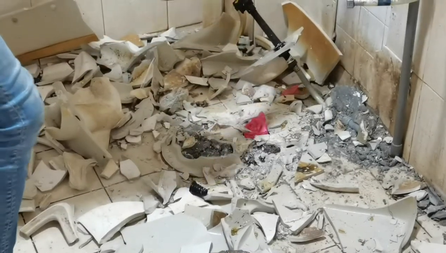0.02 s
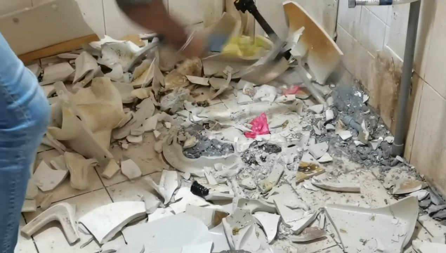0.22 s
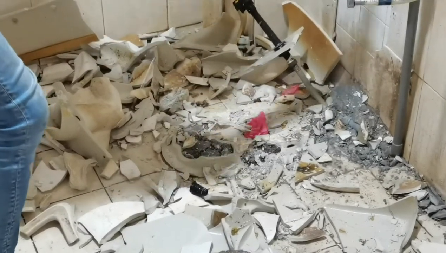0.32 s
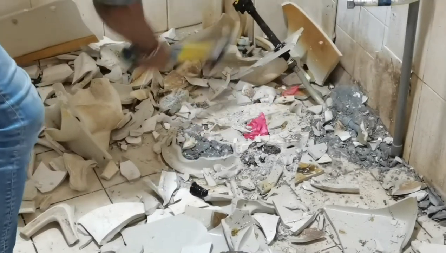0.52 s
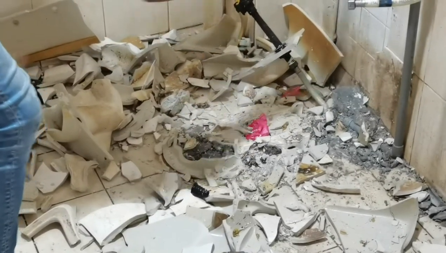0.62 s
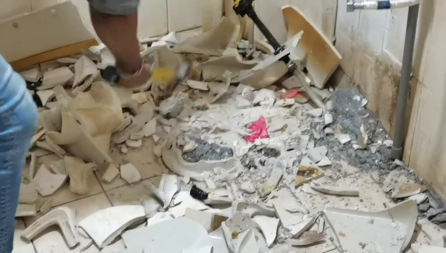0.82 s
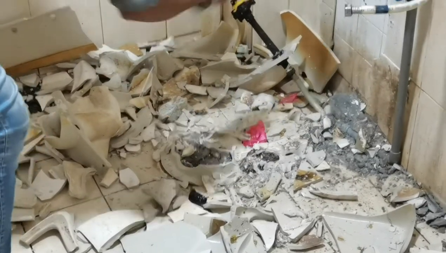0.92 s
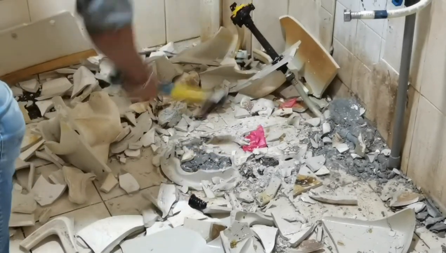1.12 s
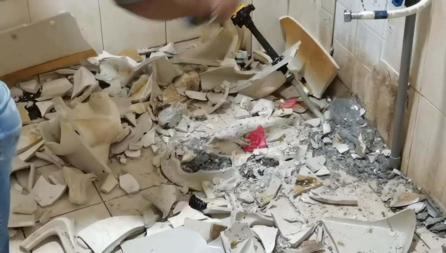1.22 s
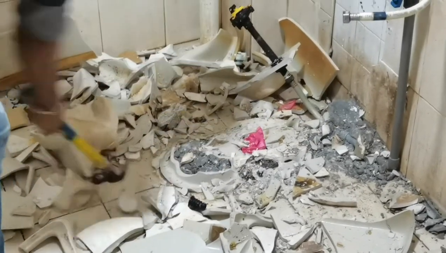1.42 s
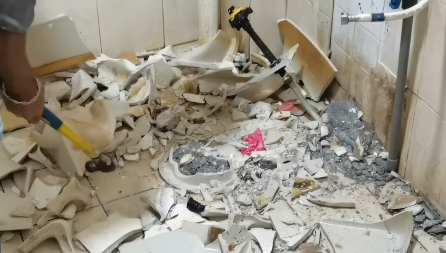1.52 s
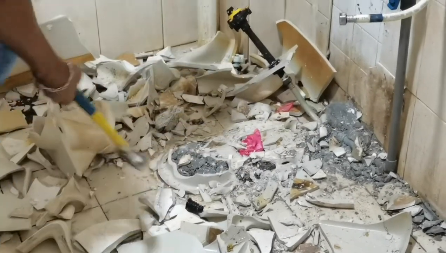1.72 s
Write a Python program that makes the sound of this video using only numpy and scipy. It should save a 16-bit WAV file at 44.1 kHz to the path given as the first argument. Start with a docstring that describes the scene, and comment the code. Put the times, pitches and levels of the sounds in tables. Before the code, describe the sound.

Rapid hammer blows crack thick ceramic apart, broken pieces clinking and skittering in a small tiled room

```python
"""Sharp smashing blows, about three a second: a hammer breaks pieces of a ceramic bowl on a small tiled
bathroom floor. Each blow is a burst of tiny cracks, a short ring of the steel head and a damped floor thud.
Pieces split, grit skitters and chips clink: filtered bursts of cracks and fading sine tones.
Fading noise gives the echoes of the hard walls, over a faint rumble and hum made of filtered noise.
The left microphone hears far more treble than the right."""
import sys
import numpy as np
from scipy import signal
from scipy.fft import rfft, irfft
from scipy.io import wavfile
from scipy.ndimage import uniform_filter1d

SR = 44100
rng = np.random.default_rng(int(sys.argv[2]) if len(sys.argv) > 2 else 0)


def int16_out(signal):
    """Quantize to a 16-bit WAV file."""
    q = np.round(np.clip(np.atleast_2d(signal).T, -1, 1) * 32767)
    wavfile.write(sys.argv[1], SR, q.astype(np.int16))


N = 79380  # samples in the scene

LENGTH = 32768  # samples in each single sound or room response
AGE = np.arange(LENGTH) / SR  # seconds since a sound began
HZ = np.maximum(np.arange(LENGTH // 2 + 1) * SR / LENGTH, 1)  # frequencies of its spectrum
CRACKS_PER_S = 5500  # average rate before the burst is faded
CLINK_T60_S = 0.041  # time for a clink to fall by 60 dB
SHARD_ROOM_DB, SHARD_DIRECT_DB = -1, 2.5  # echoes and direct sound of grit and clinks


def undb(db):
    """Turn decibels into an amplitude factor."""
    return 10 ** (np.asarray(db) / 20)


def unit(x):
    """Scale to an energy of one."""
    return x / np.sqrt(np.sum(x ** 2, axis=-1, keepdims=True))


def curve(points, hz):
    """Join (Hz, value) points by straight lines on a log-frequency axis."""
    f, v = np.array(points, float).T
    return np.interp(np.log(np.maximum(hz, 1)), np.log(f), v)


def colour(x, gain):
    """Filter with the given gain at every frequency, responding only after the input arrives."""
    # Folding the cepstrum (spectrum of the log gain) onto positive times makes the filter causal.
    cepstrum = irfft(np.log(gain + 1e-5))
    cepstrum[1:LENGTH // 2] *= 2
    cepstrum[LENGTH // 2 + 1:] = 0
    return irfft(rfft(x) * np.exp(rfft(cepstrum)))


def neutral(gain):
    """Scale a filter so that it keeps the power of white noise."""
    return gain / np.sqrt(np.mean(gain ** 2))


def hump(hz, octaves):
    """A resonance, bell-shaped in octaves."""
    distance = np.log2(HZ / hz) / octaves
    return neutral(np.exp(-distance ** 2 / 2) + 1e-3)


def ring(modes):
    """Struck modes: sine tones that each fade at their own rate (Hz, dB of energy, t60 in s)."""
    total = 0
    for hz, db, t60 in modes:
        fade = np.exp(-np.log(1000) * AGE / t60)
        total = total + undb(db) * unit(np.sin(2 * np.pi * hz * AGE) * fade)
    return total


def crackle(length_s, per_s=CRACKS_PER_S, spread_db=4):
    """A burst of tiny cracks of uneven size that dies away, about equally strong at all pitches."""
    rise_s, even_hz = 0.0022, 260  # build-up time; width over which the spectrum is evened out
    happens = rng.random(LENGTH) < per_s / SR
    sizes = rng.choice([-1, 1], LENGTH) * undb(spread_db * rng.standard_normal(LENGTH))
    envelope = (1 - np.exp(-AGE / rise_s)) ** 2 * np.exp(-AGE / length_s)
    burst = happens * sizes * envelope
    power = uniform_filter1d(np.abs(rfft(unit(burst))) ** 2, size=int(even_hz * LENGTH / SR))
    return unit(colour(burst, 1 / np.sqrt(power)))


def thump(hz, length_s):
    """A heavily damped swing of the floor."""
    return unit(np.sin(2 * np.pi * hz * AGE) * AGE * np.exp(-2 * AGE / length_s))


def room():
    """Echoes from one spot on the floor to both microphones: dense fading noise and standing waves."""
    # how long the echoes last in each part of the spectrum (f/Hz, t60/s)
    decay_times = [(100, 0.37), (300, 0.35), (800, 0.42), (2000, 0.36), (5000, 0.26), (9000, 0.3),
                   (15000, 0.18)]
    # standing waves between the walls (f/Hz, level/dB, t60/s)
    standing_waves = [(256.8, -29, 0.45), (1385, -29, 0.32)]
    build_s = 0.0016
    noise = rfft(rng.standard_normal((2, LENGTH)))
    log_centres = np.log([hz for hz, _ in decay_times])
    tail = 0
    for share, (_, t60) in zip(np.eye(len(decay_times)), decay_times):
        band = np.interp(np.log(HZ), log_centres, share)  # overlapping bands that add up to one
        tail = tail + irfft(noise * band) * np.exp(-np.log(1000) * AGE / t60)
    return unit(tail * (1 - np.exp(-AGE / build_s))) + ring(standing_waves)


def near():
    """The direct sound and its first echoes off the floor and the nearby rubble, at both microphones."""
    early_db, early_s = 0.5, 0.0032  # level relative to the direct sound; fading time
    right_lag_s = 0.00025
    path = np.array([undb(early_db) * crackle(early_s) for _ in range(2)])
    path[0, 0] += 1
    path[1, int(right_lag_s * SR)] += 1
    return unit(path)


def add(out, start_s, sound, echoes, direct_db):
    """Mix in a sound, direct and with its echoes; a negative start leaves only its later part."""
    path = echoes + undb(direct_db) * near()
    i = int(start_s * SR)
    heard = signal.fftconvolve(sound[None], path, axes=1)[:, max(-i, 0):N - i]
    first = max(i, 0)
    out[:, first:first + heard.shape[1]] += heard


def background():
    """Faint rumble of the building, and a hum: narrow noise that wavers and grows a little."""
    # spectrum of rumble and air, scaled as a whole below (f/Hz, relative level/dB per Hz)
    air_spectrum = [(25, -22), (70, -6.5), (100, -6), (140, -1.5), (300, -18), (1000, -22), (3000, -35.5),
                    (15000, -45.5)]
    air_db, hum_db, hum_hz, hum_width_hz = -61.5, -61, 96.3, 7
    swell_db = 6  # rise of the hum from start to end
    hz = np.arange(N // 2 + 1) * SR / N
    air = irfft(rfft(rng.standard_normal((2, N))) * undb(curve(air_spectrum, hz)), N)
    resonance = 1 / (1 + ((hz - hum_hz) / hum_width_hz) ** 2)
    hum = irfft(rfft(rng.standard_normal((2, N))) * resonance, N)
    swell = undb(swell_db * (np.arange(N) / N - .5))
    return np.sqrt(N) * (undb(air_db) * unit(air) + undb(hum_db) * unit(hum) * swell)


def bumps(out, echoes):
    """Heavy pieces bump dully on the floor, which swings briefly."""
    # bumps (t/s, level/dB, f/Hz)
    bump_list = [(0.954, -14, 73), (0.995, -13, 261), (1.433, -4.5, 350), (1.622, -19.5, 104)]
    for start, db, hz in bump_list:
        add(out, start, undb(db) * thump(hz, 0.014), undb(-26) * echoes, direct_db=0.0)


def knock(out, echoes):
    """A loose piece knocks once on the floor, ringing in several short modes."""
    # modes of the piece (f/Hz, relative level/dB, t60/s)
    piece_modes = [(1306, -5, 0.06), (1520, 3, 0.022), (2100, 6.5, 0.015), (3730, 2.5, 0.0066),
                   (4100, -1.5, 0.0027), (5100, -5.5, 0.0098), (10100, -6, 0.016)]
    start_s, knock_db, room_db = .4101, -19.5, -8.5
    add(out, start_s, undb(knock_db) * ring(piece_modes), undb(room_db) * echoes, direct_db=0.5)


def clinks(out, echoes):
    """Shards clink: two fading modes and a tiny tick of contact."""
    # clinks (t/s, main mode f/Hz, second mode f/Hz, level/dB)
    clink_list = [(0.305, 8400, 6490, -15), (0.473, 6220, 10300, -28), (0.590, 9750, 8700, -9),
                  (0.647, 11740, 8550, -8), (0.650, 2516, 3500, -16.5), (0.657, 4750, 5920, -9.5),
                  (0.683, 7020, 10790, -10.5), (0.718, 5070, 3940, -24), (0.7395, 9450, 12210, -16),
                  (0.7845, 9470, 12370, -12.5), (1.706, 10270, 12070, -25.5)]
    second_db, tick_db = -1.5, -2  # relative to the main mode
    for start, hz, second_hz, db in clink_list:
        tick = undb(tick_db) * colour(crackle(0.0006), hump(hz, 0.84))
        modes = ring([(hz, 0, CLINK_T60_S), (second_hz, second_db, CLINK_T60_S)])
        add(out, start, undb(db) * (modes + tick), undb(SHARD_ROOM_DB) * echoes, SHARD_DIRECT_DB)


def grit(out, echoes):
    """Grit skitters over the tiles: sparse, uneven grains with a high, narrow colour."""
    # patches of grit (t/s, fading time/s, level/dB)
    patches = [(0.258, 0.017, -10), (0.348, 0.0033, -18.5), (0.557, 0.0054, -2.5), (0.600, 0.025, -12.5),
               (0.685, 0.0092, -16), (0.920, 0.002, -20), (0.955, .025, -9), (1.025, 0.004, -18),
               (1.080, 0.0066, -33.5), (1.105, 0.004, -5.5), (1.235, .012, -23.5), (1.268, 0.004, -22.5)]
    grains_per_s, spread_db = 1600, 6.5
    centre_hz, octaves = 11170, .19
    for start, length, db in patches:
        grains = colour(crackle(length, grains_per_s, spread_db), hump(centre_hz, octaves))
        add(out, start, undb(db) * grains, undb(SHARD_ROOM_DB) * echoes, SHARD_DIRECT_DB)


def breaks(out):
    """Pieces split or tumble: bursts of cracks, each coloured by one resonance, narrow or broad."""
    # breaks (t/s, fading time/s, level/dB, centre f/Hz, width/octaves)
    break_list = [(0.219, 0.033, 3, 1390, 1.65), (0.529, 0.0051, 3.5, 1150, 2.23),
                  (0.669, 0.0032, -14.5, 4300, 0.65), (0.827, 0.0092, -3.5, 583, 1.35),
                  (0.911, 0.0024, -1.5, 5560, .9), (1.102, .008, -13.5, 5000, 3.3),
                  (1.127, .003, 3, 7000, 0.45), (1.459, 0.0028, -0.5, 10500, 0.28),
                  (1.471, 0.005, 6, 4170, 1.21), (1.499, 0.0024, -2.5, 6880, 0.081),
                  (1.544, .008, -11, 3500, 0.83)]
    for start, length, db, hz, octaves in break_list:
        add(out, start, undb(db) * colour(crackle(length), hump(hz, octaves)), room(), direct_db=-1.5)


def debris():
    """Pieces split, skitter, clink, knock and bump on the tiles."""
    out = np.zeros((2, N))
    breaks(out)
    echoes = room()  # all but the breaks share one spot on the floor
    for source in (grit, clinks, knock, bumps):
        source(out, echoes)
    return out


def chips():
    """Small chips ring as they land at random soon after a blow, the late ones softer on average."""
    count, mean_delay_s, chip_db, spread_db = 10, .06, -15, 7
    low_hz, high_hz = 3175, 12470
    out = np.zeros(LENGTH)
    for wait, pitch, size in rng.random((count, 3)):
        i = min(int(2 * wait * mean_delay_s * SR), LENGTH // 2)
        hz = low_hz * (high_hz / low_hz) ** pitch
        level = undb(chip_db + spread_db * (size - 2 * wait))
        out[i:] += level * ring([(hz, 0, CLINK_T60_S)])[:LENGTH - i]
    return out


def steel_head():
    """The hammer head rings; it takes up the blow faster than the cracks spread."""
    # modes of the head (f/Hz, relative level/dB, t60/s)
    head_modes = [(4317, 12, 0.024), (4214, -2, 0.014), (5180, -4, 0.11), (5606, 0, .035),
                  (8080, 2.5, .022)]
    return ring(head_modes) * (1 - np.exp(-AGE / 0.0013))  # rise time in seconds


def fracture(length_s, tone_db):
    """The ceramic cracks: a burst in the colour of breaking ceramic, with its own tone for each blow."""
    # fracture noise (f/Hz, relative level/dB per Hz)
    fracture_spectrum = [(40, -11.5), (130, -4), (270, 8), (600, 0), (1400, 8.5), (2200, 1), (3200, -2),
                         (5500, -11.5), (7600, -8.5), (8900, -20.5), (10500, -11), (15000, -22.5)]
    # centres of bass, middle, presence and treble (f/Hz)
    tone_centres = [260, 1350, 4600, 11500]
    tone = undb(curve(list(zip(tone_centres, tone_db)), HZ))
    gain = neutral(undb(curve(fracture_spectrum, HZ))) * tone
    return colour(crackle(length_s), gain)


def hammer():
    """Each blow cracks the ceramic, rings the steel head, shakes the floor and throws chips."""
    # blows; levels are relative (t/s, crack fading time/s, bass/dB, middle/dB, presence/dB, treble/dB,
    # steel ring/dB, floor thud/dB, direct sound/dB)
    blows = [(-0.090, 0.0042, -4, -7.5, 4.5, 12, 5, -9, -4), (0.197, 0.003, 0.5, -2, 4, 3.5, 8.5, -1.5, -3),
             (0.494, 0.0046, -4, -5, 6.5, 7.5, 11.5, -8.5, -13.5),
             (0.8034, 0.005, -4, -10.5, 8, 12, 5.5, -20, -10),
             (1.1291, 0.0038, 0, -4, -3.5, 1, 6.5, -26, -3),
             (1.4308, 0.0082, -9, -9.5, 1.5, 9.5, -12, -13.5, -13.5)]
    crack_db, steel_base_db, thud_base_db = 12, -7, 1.5
    thud_hz, thud_s = 55.6, 0.0039
    out = np.zeros((2, N))
    head = steel_head()
    for start, length, *tone_db, steel_db, thud_db, direct_db in blows:
        crack = undb(crack_db) * fracture(length, tone_db)
        steel = undb(steel_base_db + steel_db) * head
        thud = undb(thud_base_db + thud_db) * thump(thud_hz, thud_s)
        echoes = room()
        add(out, start, crack + steel + chips(), echoes, direct_db)
        add(out, start, thud, undb(-12.5) * echoes, direct_db=-3)
    return out


def scene():
    """Background, debris and hammer blows together."""
    return background() + debris() + hammer()


def record(dry):
    """Two unequally coloured microphones, a low cut, rounded peaks and a steep top cut."""
    # left minus right microphone (f/Hz, level/dB)
    left_minus_right = [(50, 10.5), (125, 6), (250, 4.5), (500, 1), (1200, 0.5), (2200, -0.5), (3200, 3.5),
                        (4300, 12), (5500, 6.5), (7000, 7.5), (8200, 23.5), (10000, 11.5), (14000, 15.5)]
    low_cut_hz, ceiling, top_hz = 28, .92, 15250
    ratio = undb(curve(left_minus_right, np.arange(N + 1) * SR / (2 * N)))
    # the two gains keep their summed power constant
    gains = np.array([ratio, np.ones(N + 1)]) * np.sqrt(2 / (1 + ratio ** 2))
    heard = irfft(rfft(dry, 2 * N) * gains)[:, :N]
    heard = signal.sosfilt(signal.butter(2, low_cut_hz, "high", fs=SR, output="sos"), heard)
    heard = heard / (1 + (heard / ceiling) ** 6) ** (1 / 6)
    return signal.sosfilt(signal.ellip(8, .2, 70, top_hz, fs=SR, output="sos"), heard)


dry = scene()
out = record(dry)
int16_out(out)
```